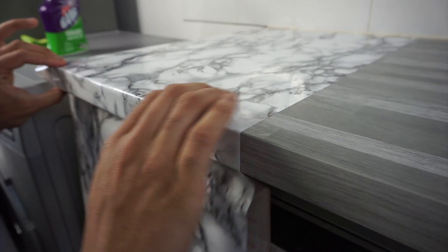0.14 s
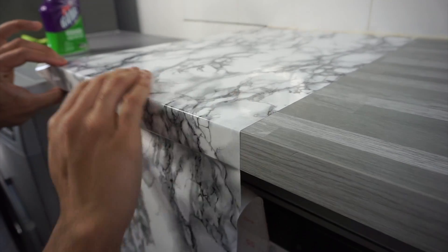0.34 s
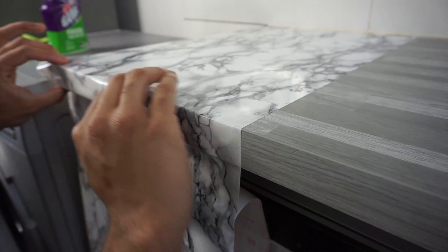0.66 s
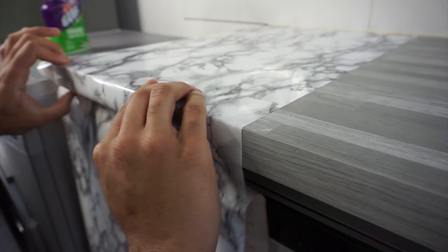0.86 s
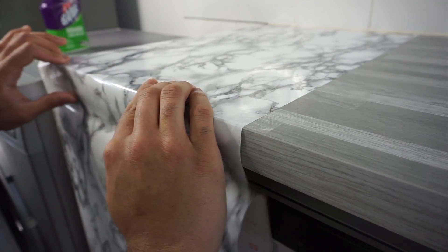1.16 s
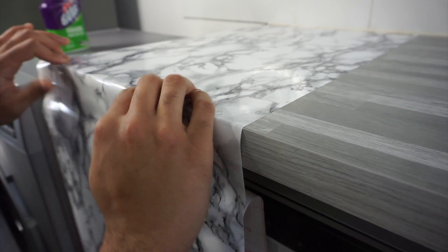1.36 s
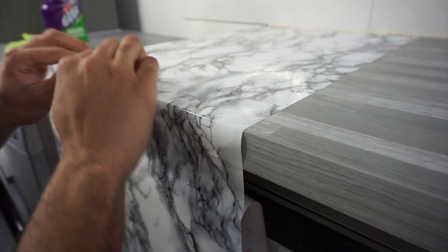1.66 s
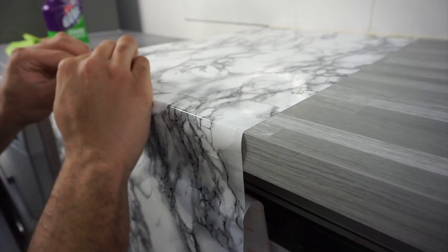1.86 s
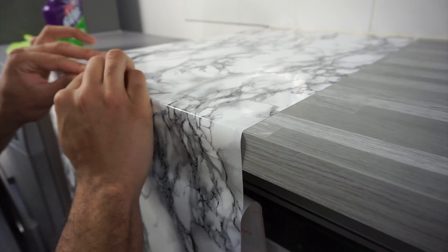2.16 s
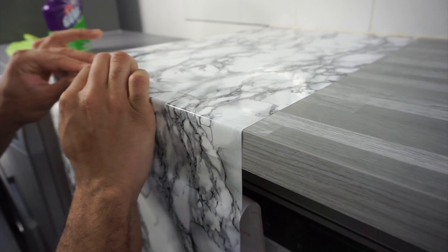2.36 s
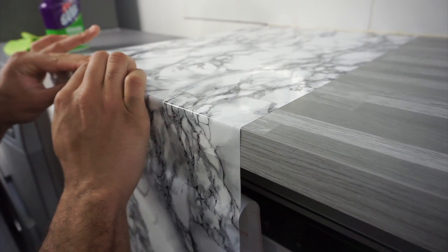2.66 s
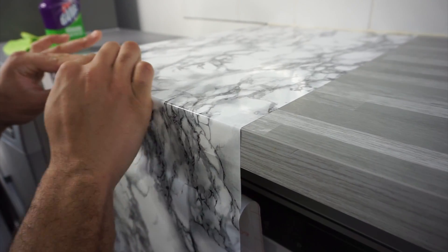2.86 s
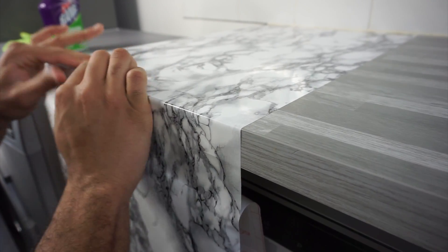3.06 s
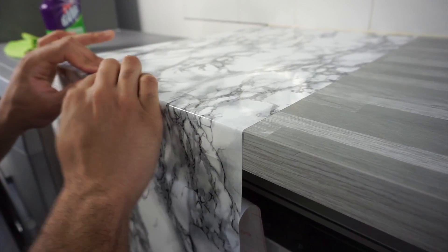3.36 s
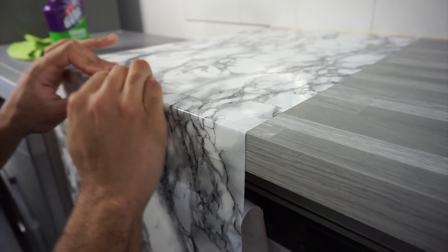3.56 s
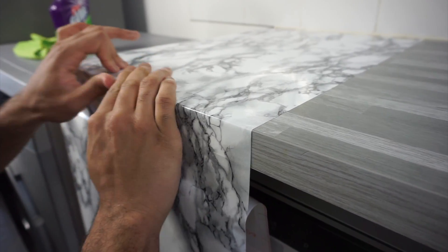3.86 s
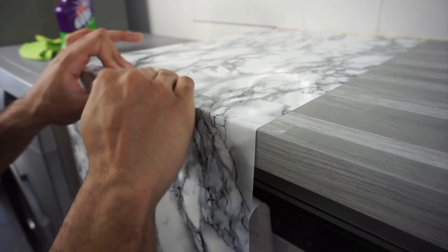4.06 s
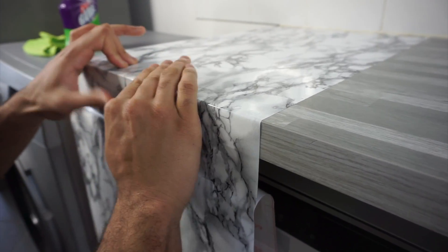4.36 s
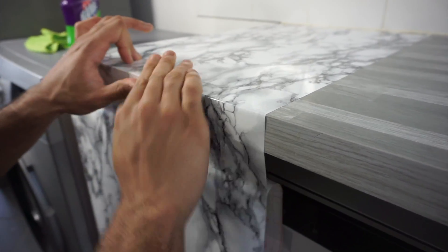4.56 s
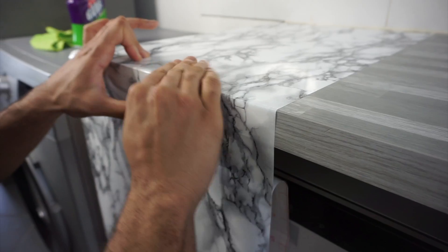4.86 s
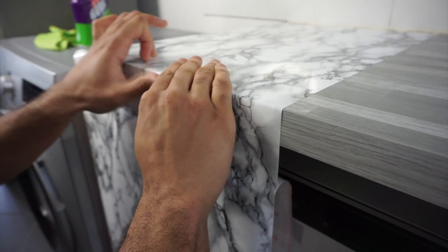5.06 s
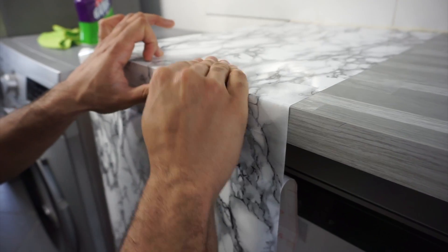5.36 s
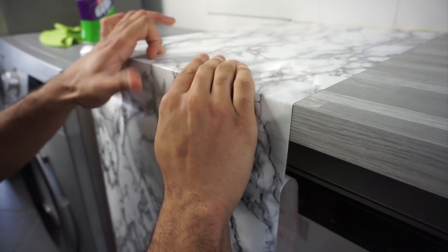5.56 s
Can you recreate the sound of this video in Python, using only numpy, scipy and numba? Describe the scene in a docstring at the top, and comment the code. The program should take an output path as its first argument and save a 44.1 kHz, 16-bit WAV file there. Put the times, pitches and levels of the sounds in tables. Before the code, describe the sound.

Hands smooth self-adhesive plastic film onto a kitchen worktop, heard close. Short, crinkly, hissing palm strokes start at once, each with a little boom from the cupboard below. At about 0.2 seconds comes the loudest event, a sharp snap of glue letting go with a hollow thump. Smaller snaps and tiny skin squeaks follow around 0.5 to 0.8 seconds, then another snap and thump near 0.9 and more rubs until 1.5. From there to about 3.8 seconds there is a lull, with faint brushes, light ticks and one bright click at 2.3. The strokes return at 3.9 and come irregularly from 4.5 to 5.5 seconds, with small snaps, soft palm bumps and a faint falling rasp near 5.2. A last light tick lands around 5.7. The small, hard room adds a short echo, and a quiet household hum runs underneath.

```python
"""Smoothing adhesive film onto a kitchen worktop.

Palm strokes hiss over the film and boom in the cupboard below. Glue lets go in snaps, the hand thumps
down, skin catches and squeaks. A small hard room echoes over a quiet household hum. Two close
microphone ports pick it up, and gain control ducks the loud moments."""
import sys
import numpy as np
from scipy import signal
from scipy.fft import rfft, irfft, next_fast_len
from scipy.io import wavfile
from scipy.ndimage import uniform_filter1d
from numba import njit

SR = 44100
rng = np.random.default_rng(int(sys.argv[2]) if len(sys.argv) > 2 else 0)


def wav_out(sig):
    """Save sig, one row per channel (or a flat mono array), as 16-bit PCM at SR to the path in sys.argv[1]."""
    wavfile.write(sys.argv[1], SR, np.round(np.clip(np.atleast_2d(sig).T, -1, 1) * 32767).astype(np.int16))


N = 251811
FILM_PAN_DB, SIZZLE_PAN_DB, CUPBOARD_PAN_DB, ROOM_PAN_DB = -4, -3, -1.8, -2  # left minus right


# Each row: start in seconds, rise in seconds, hold in seconds, fade in dB/s, scrape level in dB,
# boom and sizzle in dB re scrape, scrape centre in Hz.
STROKES = [(0.0, 0.0046, .005, 100, -41, -2, -26, 1640), (0.062, 0.016, 0.049, 263, -29, -11.5, -9, 1680),
           (0.148, 0.068, 0.0058, 200, -28.5, -10, -9, 1300),
           (.222, 0.024, .004, 162, -22.5, 0.5, -11.5, 1310),
           (0.481, 0.0051, 0.0045, 96.5, -40.5, -6.5, 6.5, 1420),
           (0.561, 0.02, 0.004, 130, -40.5, -1.5, 6, 1680), (.725, .02, .005, 250, -46, -20, -14, 1400),
           (0.806, 0.042, 0.01, 265, -25.5, -16, -9.5, 1430),
           (.941, 0.0044, 0.0055, 205, -23.5, -2.5, -1, 1250),
           (.985, 0.053, 0.048, 113, -30, -5, -37, 1580),
           (1.213, 0.059, 0.02, 186, -25.5, -10.5, -22, 1540),
           (1.385, 0.026, 0.022, 169, -37, -8.5, -29, 1550), (1.505, 0.021, 0.012, 158, -51, -14, -2, 1400),
           (1.612, 0.012, 0.012, 150, -53.5, -1, -3.5, 1550),
           (1.832, 0.022, .004, 400, -44.5, -12, -33, 1370), (2.005, 0.037, .02, 60, -63.5, -17, 7, 1810),
           (2.291, 0.014, 0.0089, 176, -43, 1.5, 3.5, 1370), (3.022, 0.0091, .005, 90, -58.5, 1, -7, 1330),
           (3.28, 0.082, .005, 200, -51.5, -14, -8, 1430), (3.361, 0.0062, .005, 216, -46, -2, -6, 1350),
           (3.92, 0.053, 0.091, 235, -33.5, -6.5, -20, 1390),
           (4.125, 0.012, 0.016, 120, -51.5, -3, -11, 1800),
           (4.30, 0.055, 0.0054, 398, -44.5, -2, -32, 1240),
           (4.432, 0.038, .004, 447, -42.5, -28, -4.5, 1660),
           (4.533, 0.026, .12, 172, -29, -8, -21.5, 1450), (4.762, 0.031, .004, 320, -38.5, -5, -21, 1900),
           (4.851, 0.018, 0.15, 286, -34, -5, -21, 1490), (5.094, 0.089, 0.0042, 211, -36, -5, -10, 1300),
           (5.445, 0.05, 0.037, 95, -35, -8, -16.5, 1290), (5.682, 0.026, .01, 200, -51.5, -7, 2, 1230)]
# Each row: time in seconds, scrape level in dB, boom and sizzle in dB re scrape.
RESTING_HAND = [(0, -47.5, -9, -10), (.45, -50.5, -14, -6), (.75, -55.5, -4.5, 6.5), (1.2, -48, 3.5, -2.5),
                (1.5, -52, 6, -6.5), (1.75, -66, 0, -2), (2.2, -64.5, -8, -8), (2.45, -60, 0, 0.5),
                (2.6, -66, -1, -5), (2.95, -85, -18, -7), (3.2, -65, 5, -3), (3.66, -63, 0.5, -5),
                (3.9, -65, 2, 0), (4.17, -58, 6, -17), (4.3, -65.5, 6.5, 1), (5.3, -58.5, 4.5, -2.5),
                (5.44, -65.5, 5.5, -4), (5.71, -58, 9, -5)]

def palm_pressure():
    """Resting hand plus strokes that rise, hold and fade. Returns scrape, boom, sizzle gains and Hz."""
    resting_hz, sag_octaves_per_s = 1590, 1.04  # the scrape darkens as a stroke slows
    rise_share = np.array([[1], [.73], [.48]])  # boom and sizzle lead
    fade_share = np.array([[1], [.89], [1]])  # boom lingers
    times, *columns = np.transpose(RESTING_HAND)
    db, boom_db, sizzle_db = (np.interp(np.arange(N) / SR, times, column) for column in columns)
    power = undb([db, db + boom_db, db + sizzle_db]) ** 2
    weighted_hz = power[0] * resting_hz
    t = np.arange(SR) / SR
    for start_s, rise_s, hold_s, fade_db_per_s, db, boom_db, sizzle_db, hz in STROKES:
        attack = np.minimum(t / (rise_s * rise_share), 1) ** 1.8
        faded_db = np.maximum(t - rise_s - hold_s, 0) * fade_db_per_s * fade_share
        levels_db = db + np.array([[0], [boom_db], [sizzle_db]])
        stroke_power = (attack * undb(levels_db - faded_db)) ** 2
        sag = 2 ** (sag_octaves_per_s * (rise_s - np.minimum(t, .4)))
        add(power, start_s, stroke_power)
        add(weighted_hz, start_s, stroke_power[0] * hz * sag)
    return *np.sqrt(power), weighted_hz / power[0]


# Each row: frequency in Hz, relative spectral density in dB.
SIZZLE_SPECTRUM = [(1470, -23), (2500, -2.5), (3270, -1.5), (3780, -3), (5180, -6.5), (8240, -8.5),
                   (11200, -12.5), (14600, -61), (22000, -120)]

def palm_strokes():
    """Skin slips over film: a scrape in a broad moving resonance, sizzle above, cupboard boom below."""
    scrape_gain, boom_gain, sizzle_gain, hz = palm_pressure()
    rub = np.array([bandpass(side, hz, .99 * hz) for side in micro_slips(spread_db=.27, grip_db=1.5)])
    scrape = unit(rub) + undb(-9) * unit(crinkles(hz))
    rumble = bandpass(micro_slips(spread_db=2.35, grip_db=.29)[0], hz=410, width_hz=780)
    boom = unit(rumble) + .34 * unit(cupboard(rumble))
    sizzle = colour(micro_slips(spread_db=3.1, grip_db=2.9), SIZZLE_SPECTRUM)
    return (scrape_gain * unit(scrape) * pan(FILM_PAN_DB)
            + sizzle_gain * unit(sizzle) * pan(SIZZLE_PAN_DB)
            + boom_gain * boom * pan(CUPBOARD_PAN_DB))


def micro_slips(spread_db, grip_db):
    """Dense slips of uneven size on a wavering grip. In the treble each port hears its own patch."""
    step = int(SR / 90)
    grip = uniform_filter1d(np.repeat(rng.standard_normal(N // step + 1), step), step)[:N]
    sizes = undb(spread_db * np.minimum(rng.exponential(size=N), 5) + grip_db * grip)
    return stereo_noise(N, alike_hz=3200) * sizes


def crinkles(scrape_hz, pops_per_s=400, reach_octaves=.8, spread_db=9.7):
    """Tiny creases pop at random, each ringing briefly at its own pitch. High ones are fainter."""
    pops = rng.random(N) < pops_per_s / SR
    latest_pop = np.maximum(np.cumsum(pops) - 1, 0)
    pitch_draw, size_draw = rng.random((N, 2))[pops][latest_pop].T
    ratio = 2 ** (reach_octaves * (2 * pitch_draw - 1))
    hz = ratio * scrape_hz
    return bandpass(pops * undb(spread_db * size_draw) / ratio, hz, .47 * hz)


# Each row: start in seconds, level in dB, pitch in Hz, edge and tail in dB re crack, tail T60 in seconds.
SNAPS = [(0.0659, -16.5, 1430, -27, -28, 0.17), (0.207, -25, 1870, -8, -1.5, 0.15),
         (.2352, -1.5, 1260, -5.5, -15.5, 0.23), (.485, -17, 3260, 3, -14.5, 0.07),
         (.489, -19, 1180, -17, -9, 0.14), (.511, -18, 4130, -15, -27.5, 0.099),
         (.583, -17.5, 3400, -13, -11, 0.17), (0.9439, -13.5, 980, -2.5, -10, 0.3),
         (1.04, -16.5, 1660, -26, -19, 0.13), (1.251, -19.5, 1300, -11.5, -5.5, 0.18),
         (1.29, -22.5, 3280, -6, -11, 0.2), (1.405, -25.5, 2080, -16, -11.5, 0.048),
         (1.846, -32.5, 1380, -25, -32, 0.048), (2.024, -31, 4230, -1.5, -17.5, 0.034),
         (2.026, -44, 1500, -20, -13, 0.045), (2.296, -9.5, 7050, -28, -22.5, 0.076),
         (2.299, -21, 1300, -31, -8, 0.073), (2.363, -36.5, 1200, 2.5, -2.5, 0.12),
         (2.799, -47, 1030, -20, -8.5, 0.098), (2.52, -52, 900, -18, -24, .08),
         (3.037, -32.5, 674, -12, -11.5, 0.16), (3.368, -37, 1220, -15, -15, 0.11),
         (3.374, -51, 8000, -20, 2.5, 0.13), (3.71, -61.5, 7500, -10, -1, 0.12),
         (3.819, -41.5, 1240, -12, -10, 0.096), (3.821, -50.5, 9100, -8, -3, 0.13),
         (3.935, -38.5, 3000, 10.5, -21, 0.1), (4.446, -40, 2720, -18, -30, 0.17),
         (4.545, -24.5, 1380, -5, -9, .08), (4.547, -16.5, 3020, -5, -44, 0.038),
         (4.779, -24.5, 2130, -20, -17, 0.067), (4.86, -27, 2180, -13, -17, 0.057),
         (4.962, -35, 3300, -17, -18, .07), (4.996, -23.5, 2540, -40, -10.5, 0.1),
         (5.115, -39.5, 1970, -16, -7.5, 0.27), (5.326, -51, 8000, -10, -7, 0.065),
         (5.676, -35.5, 2500, -21, -14, 0.11)]

def glue_snaps(edge_s=.0005):
    """Glue lets go or a nail ticks: a crack of a few cycles, a bright edge, a dying crackle."""
    out, t = np.zeros((2, N)), np.arange(int(.25 * SR)) / SR
    for start_s, db, hz, edge_db, tail_db, t60_s in SNAPS:
        age = t * hz / .78
        crack = np.sin(2 * np.pi * hz * t) * age * np.exp(1 - age)
        edge_noise, tail_noise = rng.standard_normal((2, len(t)))
        edge = unit(colour(edge_noise, SIZZLE_SPECTRUM)) * np.exp(-t / edge_s)
        fizz = undb(edge_db) * unit(colour(tail_noise, SIZZLE_SPECTRUM))
        tail = (unit(bandpass(tail_noise, hz, 2.27 * hz)) + fizz) * decay(t, t60_s)
        snap = crack + undb(edge_db) * edge + undb(tail_db) * tail
        pan_db = -2 - 3 * np.log2(hz / 1000)  # higher snaps lean right
        add(out, start_s, undb(db) * pan(pan_db) * snap)
    return out


# Each row: start in seconds, level in dB, push length in seconds, favoured pitch in Hz.
THUMPS = [(0.239, -10.5, 0.016, 315), (0.263, -21, 0.043, 114), (0.483, -27.5, 0.0055, 228),
          (0.574, -40.5, 0.018, 313), (0.942, -14.5, 0.004, 254), (1.511, -37.5, 0.013, 310),
          (2.294, -38, 0.011, 197), (2.364, -35.5, 0.0085, 270), (3.033, -45, 0.011, 308),
          (3.339, -47.5, 0.014, 163), (3.458, -43.5, 0.026, 240), (3.919, -31.5, 0.013, 243),
          (4.314, -36, 0.012, 174), (4.533, -30.5, 0.012, 316), (4.841, -26, 0.019, 259),
          (5.114, -36.5, 0.0091, 161), (5.449, -36, 0.021, 182)]

def hand_thumps():
    """The palm lands and settles. The cupboard rings, most near the pitch that the spot favours."""
    out, t = np.zeros(N), np.arange(int(.6 * SR)) / SR
    for start_s, db, push_s, hz in THUMPS:
        envelope = np.exp(-t / push_s) * np.minimum(2.7 * t / push_s, 1)
        push = bandpass(rng.standard_normal(len(t)) * envelope, hz, .75 * hz)
        ring = cupboard(push)
        add(out, start_s, undb(db) * ring / np.abs(ring).max())
    return out * pan(CUPBOARD_PAN_DB)


# Each row: frequency in Hz, relative level in dB, T60 in seconds.
PANEL_MODES = [(87, -6.5, 0.34), (132, -5.5, 0.12), (173.5, -8.5, 0.35), (197, -4.5, 0.13), (237, -3, .15),
               (313.8, -6, 0.19), (340, -9, 0.16), (390, -3, 0.15), (462.5, -5, 0.095), (664, -25, 0.31),
               (774, -4.5, 0.18), (900, -1, 0.14)]

def cupboard(push):
    """The hollow cupboard rings in its panel modes, damped by the resting palm."""
    t = np.arange(int(.6 * SR)) / SR
    ring = sum(undb(db) * np.sin(2 * np.pi * hz * t) * decay(t, t60_s) for hz, db, t60_s in PANEL_MODES)
    return signal.fftconvolve(push, ring)[:len(push)]


# Each row: start in seconds, level in dB, start and end pitch in Hz, length in seconds, roughness 0-1.
SQUEAKS = [(.562, -22, 4450, 4100, .01, .4), (.574, -26, 4450, 4150, .01, .5),
           (.582, -24, 4100, 3200, .024, .55), (.815, -30, 2900, 1300, .02, 1.0),
           (.828, -27, 1400, 800, .03, .9), (1.405, -36, 2300, 2000, .018, .9),
           (4.444, -39, 2750, 2650, .03, .8), (5.17, -47, 950, 580, .15, 1.0)]

def skin_squeaks():
    """Skin catches on the edge and sings on a falling pitch, part tone, part rasp."""
    out = np.zeros(N)
    for start_s, db, start_hz, end_hz, length_s, roughness in SQUEAKS:
        hz = np.geomspace(start_hz, end_hz, int(length_s * SR))
        rasp = unit(bandpass(rng.standard_normal(len(hz)), hz, .2 * hz))
        tone = np.sin(2 * np.pi * np.cumsum(hz) / SR)
        envelope = np.hanning(len(hz)) ** .5
        add(out, start_s, undb(db) * envelope * ((1 - roughness) * tone + roughness * rasp))
    return out * pan(FILM_PAN_DB)


def room_echoes(x, low_t60_s=.35, treble_t60_s=.25, level_db=-9):
    """Dense echoes off hard walls. The treble dies first."""
    t = np.arange(int(.5 * SR)) / SR
    echoes = stereo_noise(len(t), alike_hz=1470)
    lows = signal.lfilter(*signal.butter(1, 2500, fs=SR), echoes)
    tail = lows * decay(t, low_t60_s) + (echoes - lows) * decay(t, treble_t60_s)
    tail *= np.clip(t / .0027 - .6, 0, 1)  # builds after the first reflection
    tail *= undb(level_db) / np.sqrt(np.sum(tail ** 2) / 2)
    return signal.fftconvolve(x[None], tail, axes=1)[:, :N] * pan(ROOM_PAN_DB)


# Each row: frequency in Hz, relative spectral density in dB.
HUM_SPECTRUM = [(12, -47), (20, -17), (47, -5), (76, -15.5), (97, -5), (190, -10.5), (229, -5.5),
                (322, -15.5), (480, -12), (695, -16.5), (1280, -20.5), (1540, -13), (1850, -17.5),
                (2680, -16.5), (3310, -27), (6770, -26.5), (11200, -31), (14600, -65), (22000, -120)]
# Each row: centre in Hz, width in Hz, level in dB.
WHINES = [(1530, 33, -69.5), (2664, 39, -70.5)]

def household(hum_db=-55.5, drone_db=-62, drone_peak_s=4, drone_sigma_s=.46):
    """A broad hum, two narrow appliance whines and a low drone that swells and fades."""
    hum = undb(hum_db) * unit(colour(stereo_noise(N, alike_hz=820), HUM_SPECTRUM))
    for hz, width_hz, db in WHINES:
        hum += [undb(db) * unit(bandpass(side, hz, width_hz)) for side in rng.standard_normal((2, N))]
    swell = np.exp(-.5 * ((np.arange(N) / SR - drone_peak_s) / drone_sigma_s) ** 2)
    drone = unit(bandpass(rng.standard_normal(N), hz=97.3, width_hz=2.1))
    return (hum + undb(drone_db) * swell * drone) * pan(ROOM_PAN_DB)


def undb(db):
    """dB to gain."""
    return 10 ** (np.asarray(db) / 20)


def unit(x):
    """Scale to rms 1."""
    return x / np.sqrt(np.mean(x ** 2))


def decay(t, t60_s):
    """Envelope falling 60 dB in t60_s."""
    return 1000 ** (-t / t60_s)


def pan(db):
    """Stereo gains for a left-minus-right level."""
    return undb(np.array([[db], [-db]]) / 2)


def add(out, start_s, x):
    """Mix x in at start_s."""
    i = int(start_s * SR)
    out[..., i:i + x.shape[-1]] += x[..., :N - i]


def stereo_noise(size, alike_hz):
    """Noise shared by both ports below alike_hz, independent above."""
    shared, own = rng.standard_normal(size), rng.standard_normal((2, size))
    b, a = signal.butter(1, alike_hz, fs=SR)
    return signal.lfilter(b, a, signal.lfilter(b, a, shared - own)) + own


def colour(x, points):
    """Shape the spectrum by (Hz, dB) points."""
    hz, db = np.transpose(points)
    size = next_fast_len(x.shape[-1])
    bins_hz = np.arange(size // 2 + 1) * SR / size + 1
    gain = undb(np.interp(np.log(bins_hz), np.log(hz), db))
    return irfft(rfft(x, size) * gain, size)[..., :x.shape[-1]]


def bandpass(x, hz, width_hz):
    """Two resonators in series, with steady or moving centre and width."""
    hz, width_hz = np.full(len(x), hz, float), np.full(len(x), width_hz, float)
    return resonator(resonator(x, hz, width_hz), hz, width_hz)


@njit
def resonator(x, hz, width_hz):
    """State-variable band-pass, gain 1 at the centre."""
    y, band_state, low_state = np.empty(len(x)), 0., 0.
    for i in range(len(x)):
        g, damping = np.tan(np.pi * hz[i] / SR), width_hz[i] / hz[i]
        band = (band_state + g * (x[i] - low_state)) / (1 + g * (g + damping))
        band_state = 2 * band - band_state
        low_state += 2 * g * band
        y[i] = damping * band
    return y


@njit
def follow(x, attack_s, release_s):
    """Envelope follower."""
    y, level = np.empty(len(x)), 0.
    for i in range(len(x)):
        level += (x[i] - level) / (SR * (attack_s if x[i] > level else release_s))
        y[i] = level
    return y


def scene():
    """Hand and film with their echoes, over the household hum."""
    direct = palm_strokes() + hand_thumps() + skin_squeaks() + glue_snaps()
    worktop = direct + room_echoes(direct.mean(axis=0))
    worktop[1] = np.roll(worktop[1], 2)  # right port lags 2 samples
    low_cut = signal.butter(2, 53.5, "high", fs=SR, output="sos")  # the near sounds carry no deep bass
    return signal.sosfilt(low_cut, worktop) + household()


def record(dry, knee_db=-37.5, squeeze=.26, top_hz=11150):
    """Gain control ducks fast and recovers slowly. A steep low-pass cuts the top."""
    level = follow(np.abs(dry).max(axis=0), attack_s=.0021, release_s=.18)
    gain = (1 + level / undb(knee_db)) ** -squeeze
    return signal.sosfilt(signal.ellip(10, .2, 70, top_hz, fs=SR, output="sos"), dry * gain)


dry = scene()
out = record(dry)
wav_out(out)
```